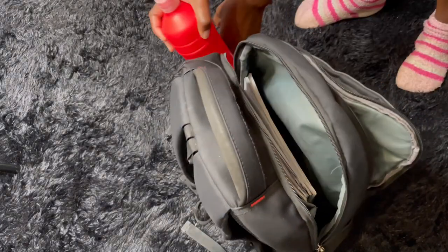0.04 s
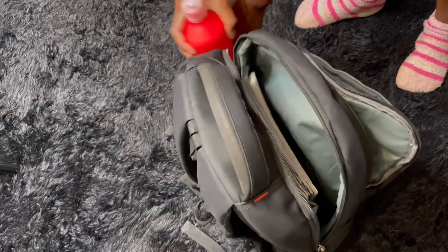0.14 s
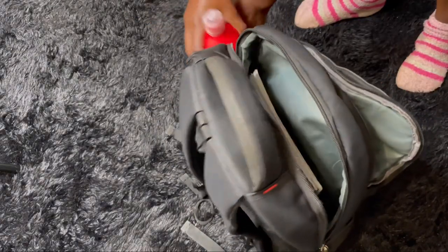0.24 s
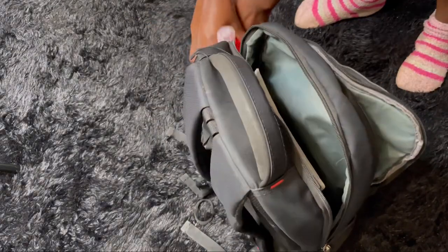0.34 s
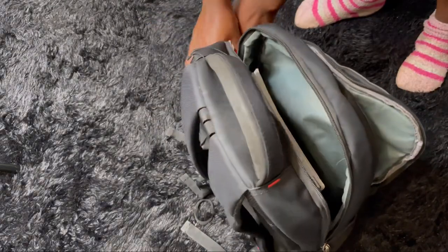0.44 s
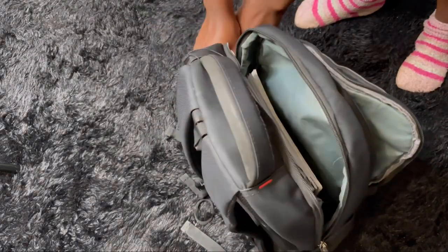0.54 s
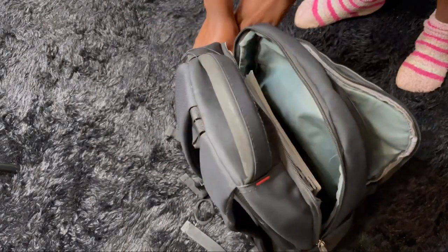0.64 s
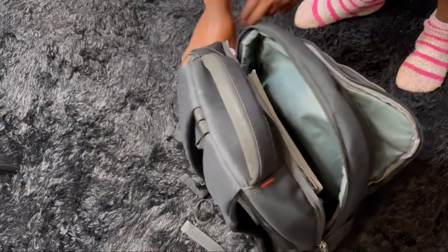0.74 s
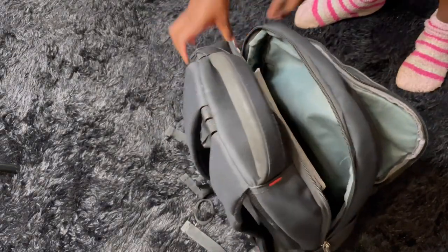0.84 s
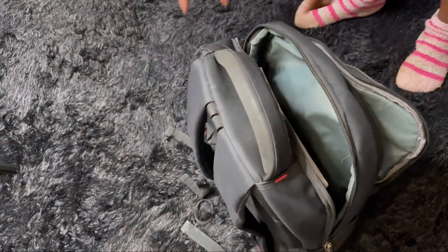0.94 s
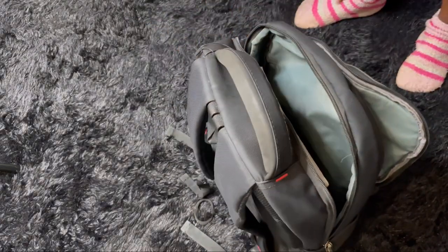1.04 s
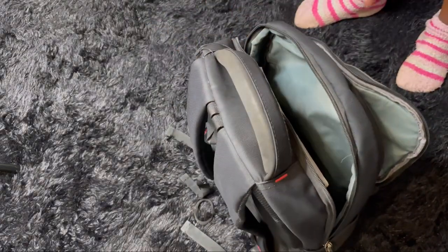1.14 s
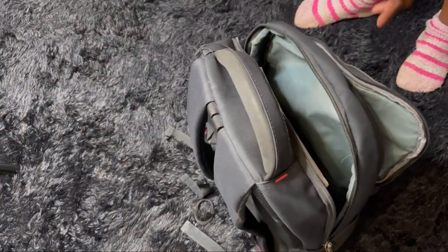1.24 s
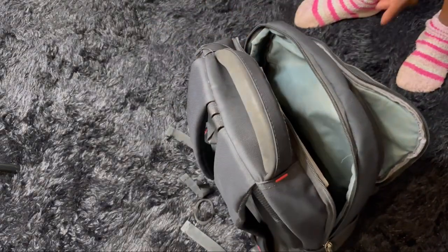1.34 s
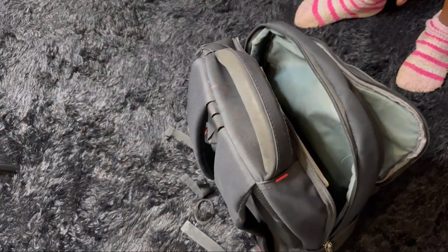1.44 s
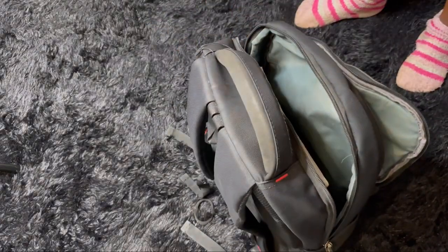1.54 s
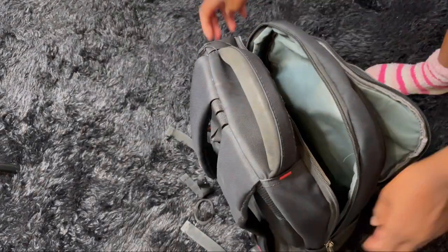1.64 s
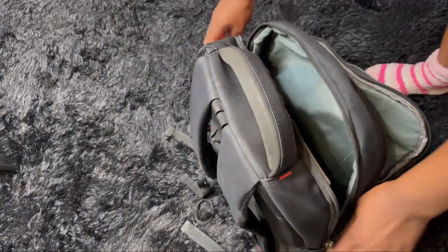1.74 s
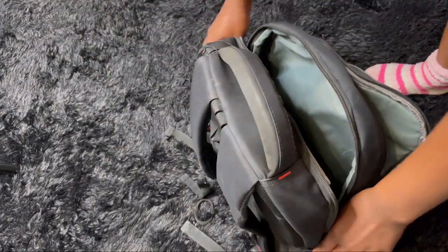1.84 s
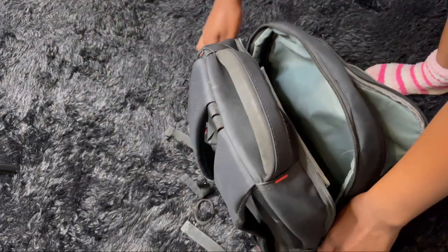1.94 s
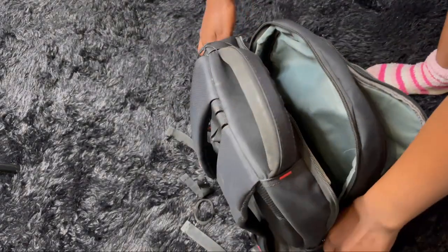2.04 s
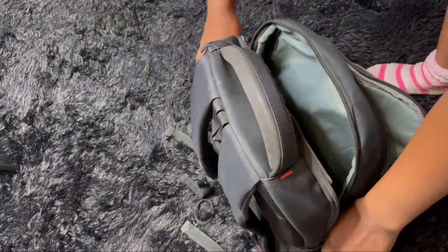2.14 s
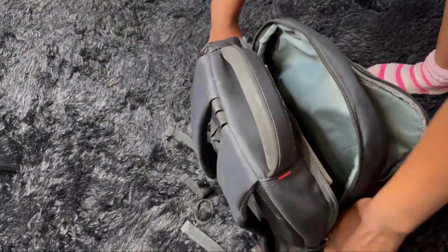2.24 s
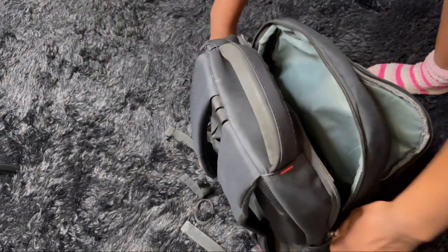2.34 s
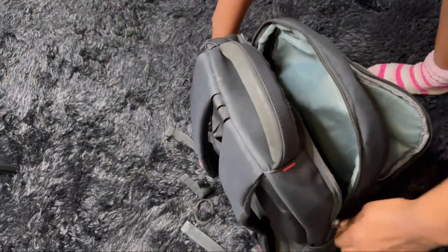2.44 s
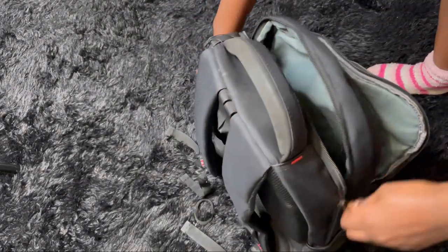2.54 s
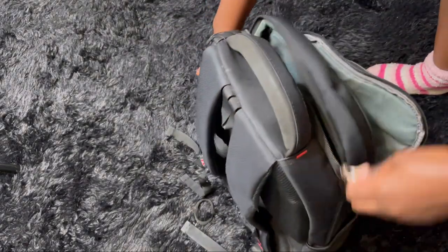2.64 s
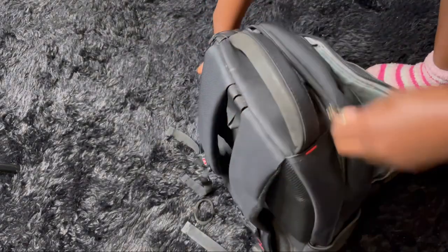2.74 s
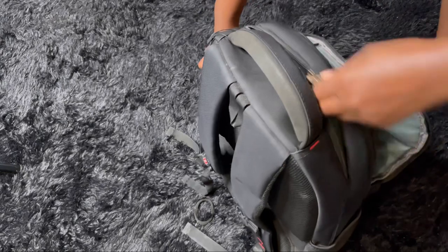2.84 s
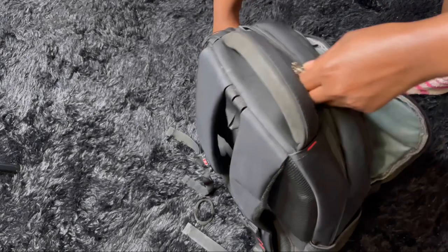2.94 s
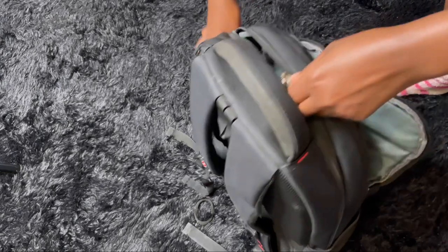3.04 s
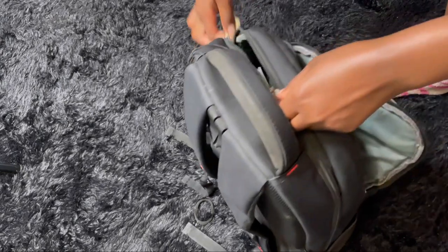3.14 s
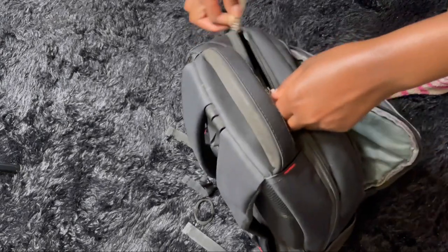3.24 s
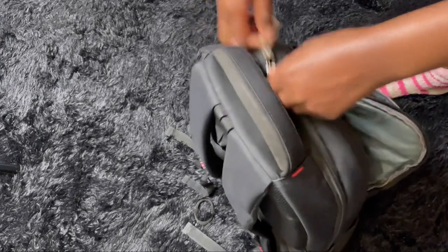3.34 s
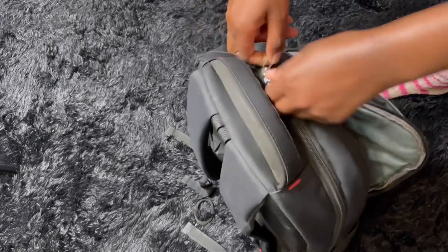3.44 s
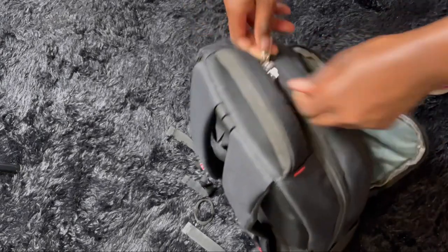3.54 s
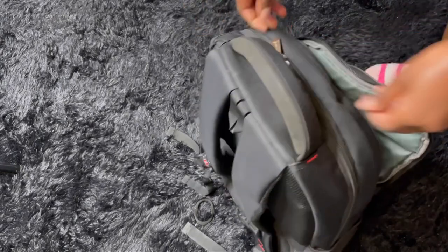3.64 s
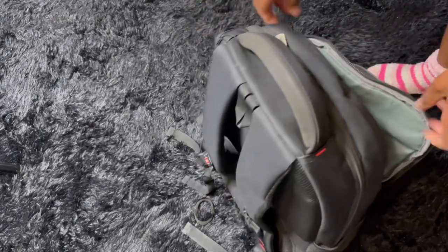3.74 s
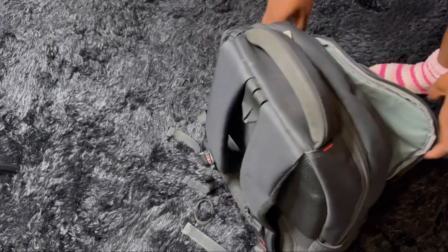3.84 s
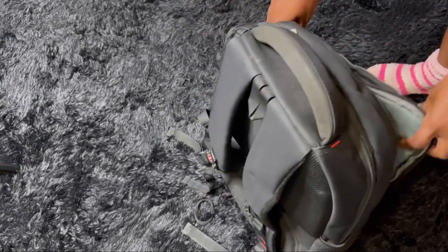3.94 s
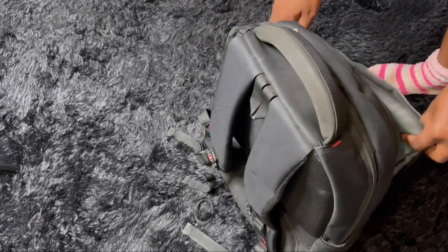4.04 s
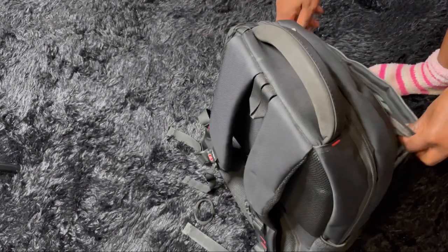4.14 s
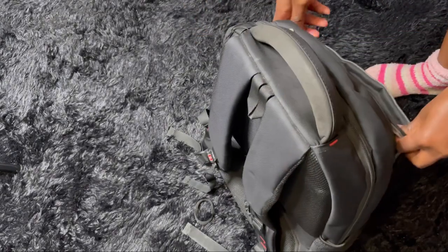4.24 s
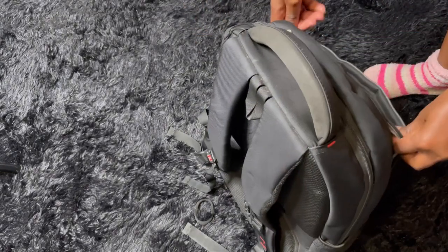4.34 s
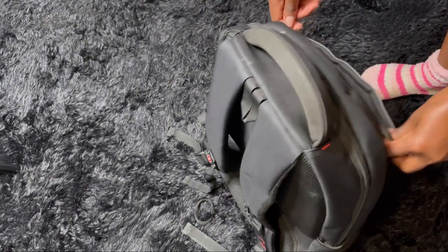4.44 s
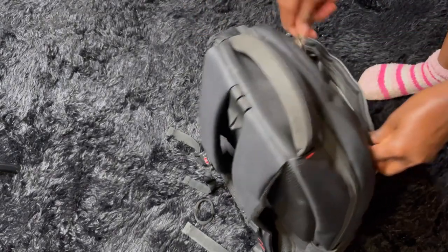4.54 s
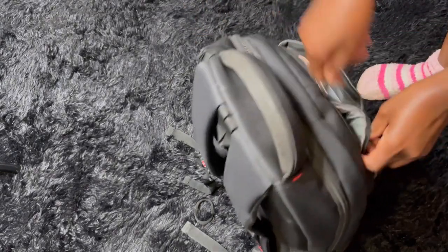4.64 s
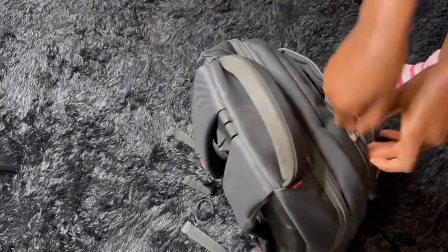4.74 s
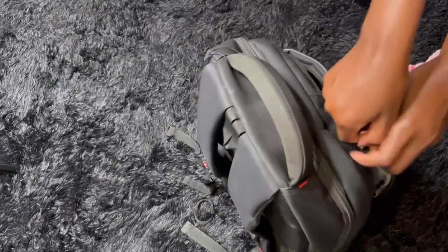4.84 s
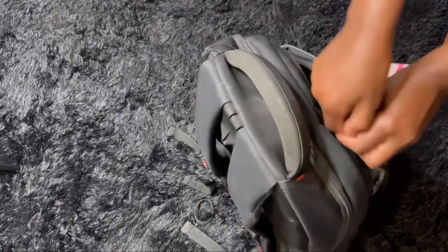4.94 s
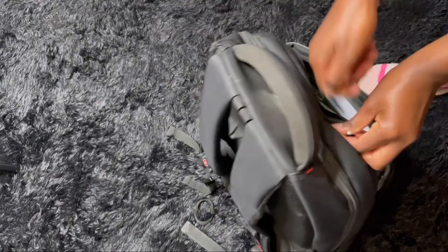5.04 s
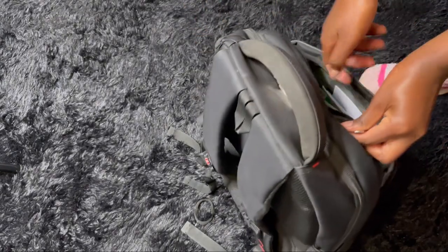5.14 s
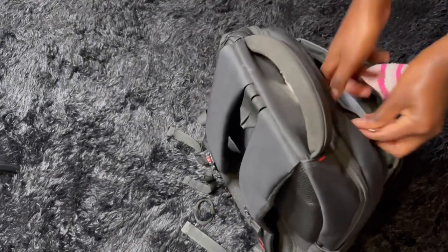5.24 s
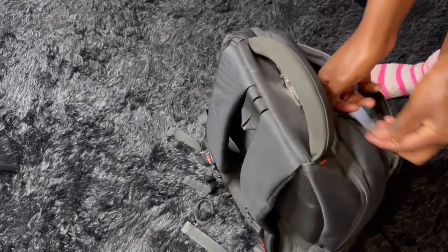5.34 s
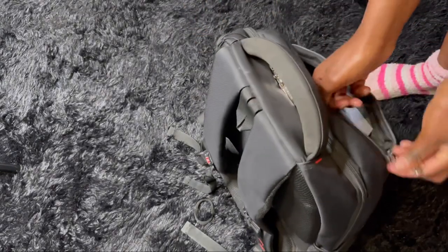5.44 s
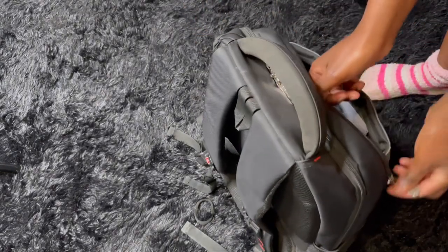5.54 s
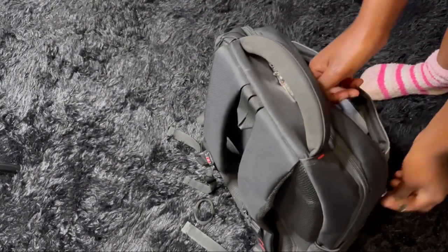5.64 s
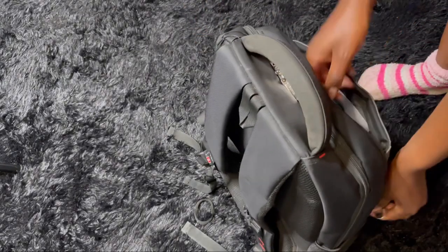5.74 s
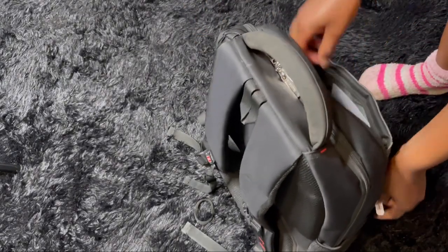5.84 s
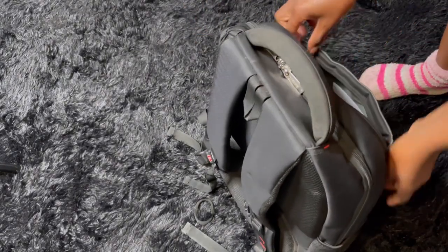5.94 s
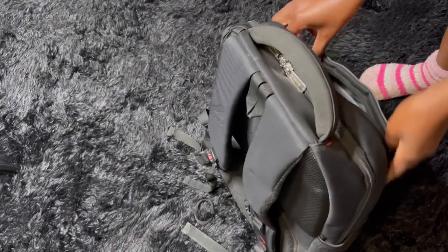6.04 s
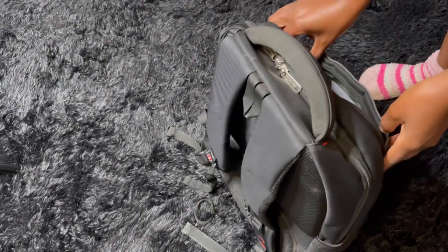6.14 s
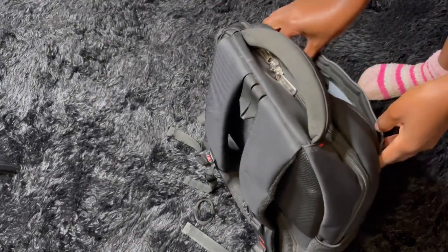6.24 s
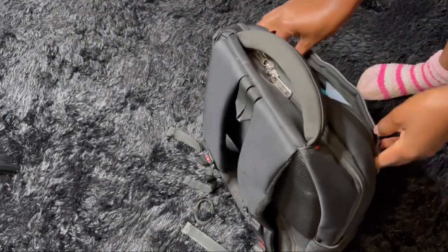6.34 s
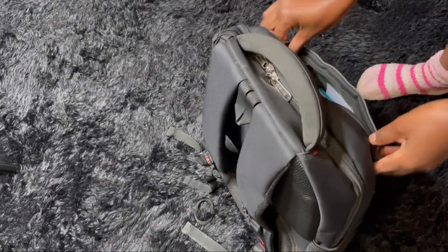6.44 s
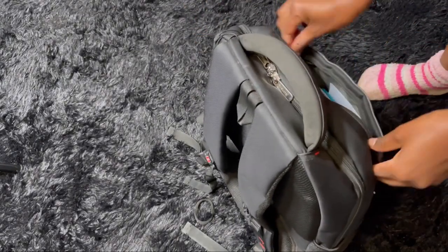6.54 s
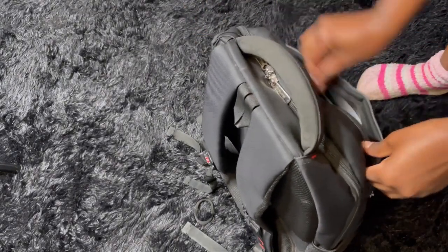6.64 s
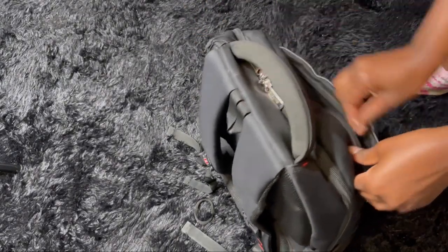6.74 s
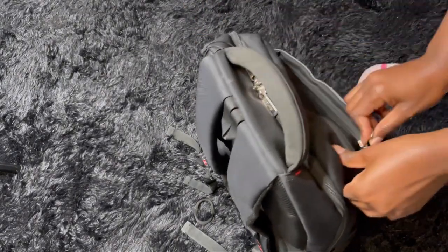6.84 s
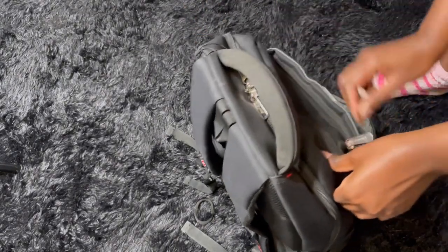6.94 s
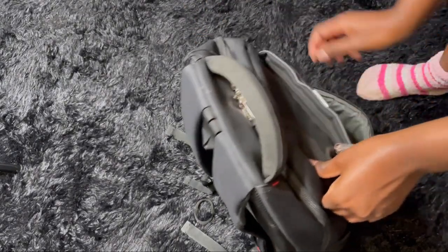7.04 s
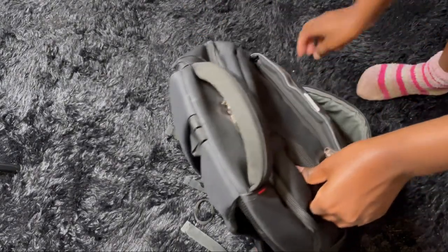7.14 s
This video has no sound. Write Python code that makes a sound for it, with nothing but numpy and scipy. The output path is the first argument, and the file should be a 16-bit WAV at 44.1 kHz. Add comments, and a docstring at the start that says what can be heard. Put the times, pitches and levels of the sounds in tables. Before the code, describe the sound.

Cloth rustles with a few dull knocks as a bottle is pushed into a fabric backpack. After a brief lull, the zipper buzzes shut in a string of short pulls, its pitch rising and falling with each one. Between pulls, metal tabs clink, hands rub and tap the cloth, and the bag bumps softly on carpet. It is all heard close up, in stereo, in a quiet room.

```python
"""Cloth rustles and knocks, then a coil zipper buzzes shut along a fabric backpack in short strokes.
Each tooth the slider joins drums the bag's panels and adds a burst of rasp, so the pitch follows the pull.
Metal pull tabs clink, hands tap and rub the cloth, and the bag bumps on the carpet.
A two-port microphone hears it all close up in a quiet room."""
import sys
import numpy as np
from scipy import signal
from scipy.fft import rfft, irfft, next_fast_len
from scipy.io import wavfile
from scipy.ndimage import uniform_filter1d, map_coordinates

SR = 44100
rng = np.random.default_rng(int(sys.argv[2]) if len(sys.argv) > 2 else 0)


def inscribe(sig):
    """Save sig as 16-bit PCM at rate SR to the path in sys.argv[1].

    A 1-D sig is mono; a 2-D sig holds one channel per row.
    Samples are clipped to [-1, 1] before scaling.
    """
    pcm = np.round(np.clip(np.atleast_2d(sig).T, -1, 1) * 32767)
    wavfile.write(sys.argv[1], SR, pcm.astype(np.int16))


N = 317079

# how alike left and right are for close sounds; the top treble is mono: f/Hz, correlation/0-1
CLOSE_LIKENESS = [(60, 0.94), (300, 0.87), (700, 0.23), (1500, 0.5), (4000, 0.41), (8000, 0.99), (11000, 1),
                  (13500, 1)]
# how alike left and right are for the room: f/Hz, correlation/0-1
ROOM_LIKENESS = [(60, 0.88), (300, 0.49), (700, 0.33), (3000, 0.18), (8000, 0.3), (11000, 0.61),
                 (13500, 0.62)]


def amp(db):
    """Decibels to gain."""
    return 10 ** (np.asarray(db) / 20)


def unit(x):
    """Scale to an rms of 1."""
    return x / np.sqrt(np.mean(x ** 2) + 1e-20)


def along(points, hz):
    """Read (f/Hz, value) points on a log frequency axis."""
    f, v = np.transpose(points)
    return np.interp(np.log(hz + 1), np.log(f + 1), v)


def curves(rows):
    """One automation curve for each column after the time."""
    times, *columns = np.transpose(rows)
    return [np.interp(np.arange(N) / SR, times, column) for column in columns]


def wobble(rate):
    """A smooth random curve, rate knots a second."""
    return map_coordinates(rng.standard_normal(int(N * rate / SR) + 4), [np.arange(N) * rate / SR])


def soft_noise(t, size):
    """Noise as long as t, averaged over size samples."""
    return uniform_filter1d(rng.standard_normal(len(t)), size=size)


def filtered(x, response):
    """Filter x by a complex response of frequency."""
    m = next_fast_len(N + SR // 2)
    return irfft(rfft(x, m) * response(np.fft.rfftfreq(m, 1 / SR)), m)[..., :N]


def stereo_noise(spectrum, likeness, grain=1):
    """Stereo noise of rms 1, chopped by a grain envelope before it is coloured."""
    spread = lambda hz: np.arccos(np.clip(along(likeness, hz), -1, 1)) / 2
    shape = lambda hz: amp(along(spectrum, hz)) * [np.cos(spread(hz)), np.sin(spread(hz))]
    mid, side = filtered(grain * rng.standard_normal((2, N)), shape)
    return unit(np.array([mid + side, mid - side]))


def resonate(x, modes):
    """Play x through (f/Hz, width/Hz, level/dB) resonances of alternating polarity."""
    return filtered(x, lambda f: sum((-1) ** k * amp(db) * 1j * f * width / (hz**2 - f**2 + 1j * f * width)
                                     for k, (hz, width, db) in enumerate(modes)))


def patchy(x, depth_db):
    """Shift the colour of the cloth in random patches of time and pitch."""
    bins = signal.stft(x, nperseg=1024, noverlap=768)[2]
    patches = uniform_filter1d(rng.standard_normal(bins.shape[-2:]), size=6, axis=0)
    patches = unit(uniform_filter1d(patches, size=6, axis=1))
    gain = amp(depth_db * patches - depth_db ** 2 * np.log(10) / 20)  # holds the mean power
    return signal.istft(bins * gain, nperseg=1024, noverlap=768)[1][..., :N]


def zipper():
    """Each tooth that the slider joins gives the bag panels one push and sheds one burst of rasp."""
    # slider moves, one list a stroke: t/s, rate/teeth per s, drumming level/dB
    strokes = [
        [(2.345, 151.3, -39), (2.387, 175.4, -36), (2.415, 213.9, -37.5), (2.445, 255.6, -40),
         (2.489, 283.2, -28), (2.519, 389.1, -27.5), (2.541, 394.6, -28), (2.569, 390.9, -27.5),
         (2.585, 370.4, -29.5), (2.611, 317.6, -28), (2.635, 363.6, -28.5), (2.657, 531.4, -28.5),
         (2.663, 539.7, -30.5), (2.691, 432.8, -34.5), (2.711, 440.7, -33), (2.733, 393.0, -38.5),
         (2.759, 322.3, -30.5), (2.781, 259.1, -36), (2.841, 228.3, -34), (2.867, 195.7, -34),
         (2.891, 157.8, -30), (2.925, 106.3, -38.5)],
        [(2.935, 105.4, -28.5), (2.953, 130.1, -33), (2.973, 158.5, -26), (2.999, 181.4, -24),
         (3.015, 248.0, -26.5), (3.021, 271.4, -24.5), (3.043, 289.2, -30.5), (3.059, 373.6, -26),
         (3.067, 391.7, -26), (3.101, 425.2, -19.5), (3.131, 445.9, -24.5), (3.163, 453.1, -22),
         (3.181, 509.6, -24), (3.197, 452.8, -49), (3.203, 417.8, -30.5), (3.213, 342.6, -25.5),
         (3.225, 259.8, -38), (3.28, 176.5, -33)],
        [(3.29, 183, -29), (3.315, 230, -29), (3.331, 290, -30), (3.35, 305, -24.5), (3.375, 336, -34.5)],
        [(4.39, 172.7, -57), (4.41, 219.6, -46), (4.434, 279.6, -42), (4.458, 266.8, -50.5),
         (4.5, 323.9, -41.5), (4.526, 300.6, -46), (4.566, 194.4, -39), (4.595, 232.0, -46)],
        [(4.6, 303.4, -38), (4.606, 337.1, -42.5), (4.62, 400.8, -35), (4.642, 440.3, -30.5),
         (4.66, 464.8, -42), (4.672, 572.9, -33.5), (4.69, 390.4, -32.5), (4.708, 432.1, -29.5),
         (4.72, 496.1, -38), (4.738, 427.0, -42), (4.76, 398.8, -48)],
        [(4.866, 400, -38), (4.875, 850, -36.5), (4.885, 900, -39.5), (4.893, 800, -61)],
        [(5.345, 157.6, -51), (5.369, 207.2, -44), (5.385, 286.1, -44), (5.391, 307.2, -37.5),
         (5.449, 257.8, -30), (5.475, 261.8, -32.5), (5.509, 269.3, -34), (5.529, 338.9, -44),
         (5.541, 373.0, -40), (5.57, 372.2, -35)],
        [(5.575, 347.9, -34), (5.593, 422.9, -25.5), (5.601, 447.4, -28), (5.609, 433.9, -36),
         (5.627, 394.8, -24.5), (5.655, 382.8, -24), (5.661, 370.4, -20), (5.669, 329.2, -21),
         (5.685, 246.0, -33), (5.717, 203.1, -34), (5.75, 145.4, -45)],
        [(6.54, 110.6, -58), (6.576, 166.1, -48), (6.59, 221.6, -36), (6.62, 396.8, -33.5), (6.64, 535.7, -57),
         (6.652, 608.6, -48), (6.7, 668.5, -34.5), (6.726, 638.6, -45), (6.77, 543.3, -34), (6.778, 470.1, -39),
         (6.792, 301.4, -33), (6.812, 197.5, -48.5), (6.83, 157.7, -51), (6.85, 115.6, -54)],
    ]
    # how each stroke drags: unevenness/0-1, small panels' level/dB
    drags = [(.22, 0.5), (.16, -1.5), (.6, -3), (.3, -1.5), (.15, -1.5), (.6, 9), (.09, 2.5), (.4, -5),
             (.3, -4)]
    # rasp along each run of strokes: t/s, level/dB
    rasp_runs = [
        [(2.345, -50), (2.431, -47), (2.453, -45.5), (2.487, -48), (2.505, -39), (2.635, -40), (2.647, -32),
         (2.699, -35.5), (2.737, -35), (2.755, -42), (2.893, -46.5), (2.93, -51)],
        [(2.935, -51), (2.979, -45), (3.085, -42), (3.093, -41), (3.103, -39.5), (3.135, -36), (3.147, -41),
         (3.171, -38), (3.227, -56.5), (3.375, -35.5)],
        [(4.39, -55), (4.398, -53.5), (4.5, -43.5), (4.538, -59), (4.658, -40), (4.668, -37.5), (4.734, -39),
         (4.76, -68)],
        [(5.255, -56.5), (5.279, -42.5), (5.297, -55.5), (5.423, -37), (5.501, -43.5), (5.517, -40.5),
         (5.535, -41.5), (5.571, -40.5), (5.585, -26.5), (5.659, -31), (5.695, -47), (5.75, -54)],
        [(6.548, -78), (6.598, -50), (6.618, -37.5), (6.654, -42), (6.704, -33.5), (6.714, -37), (6.736, -33.5),
         (6.792, -36.5), (6.808, -43.5), (6.85, -55)],
    ]
    # colour of the rasp: f/Hz, relative level/dB
    rasp_colour = [(200, -11), (600, 1), (1000, -3), (1400, 3), (1800, -2), (2300, -6.5), (2800, -7),
                   (3800, -9.5), (4800, -15.5), (6500, -16), (9000, -16), (13000, -17.5), (15500, -24),
                   (16200, -56.5)]
    # bag panel modes, the four of the large panels first: f/Hz, width/Hz, level/dB
    panels = [(154, 20, 1), (268.3, 44, -1.5), (435, 97, -2.5), (555, 117, -5), (910, 190, -2.5),
              (1013, 317, -7.5), (1247, 143, -6.5), (1270, 360, -14.5), (1960, 420, -18), (3160, 420, -33)]
    cruise_hz, catch_per_octave, snag = 300, .45, .6
    moves = [(*row, *drag) for stroke, drag in zip(strokes, drags) for row in stroke]
    rate, drum_db, uneven, small_db = curves(moves)
    rasp_db, = curves([row for run in rasp_runs for row in run])
    # snags come and go; below cruising speed the teeth catch more unevenly
    octaves_slow = np.maximum(-np.log2(rate / cruise_hz), 0)
    uneven = np.clip(uneven * np.exp(snag * wobble(25)) + catch_per_octave * octaves_slow, 0, 1)
    t = np.arange(N) / SR
    moving = sum((t > stroke[0][0] - .006) & (t < stroke[-1][0] + .006) for stroke in strokes) > 0
    moving = uniform_filter1d(1. * moving, size=300)
    jitter = .12 * (.12 + uneven) * wobble(300) + .07 * uneven * wobble(90) + .02 * wobble(40)
    teeth = np.cumsum(rate * (1 + jitter)) / SR
    strength = amp(3 * uneven * rng.standard_normal(N // 40)[teeth.astype(int)])
    tooth_age = teeth % 1 / rate
    snap = np.exp(-tooth_age / .00022) * amp(2.2 * wobble(45))
    grit = .3 * uneven * np.exp(-tooth_age / .002) * rng.standard_normal(N)
    pushes = moving * strength * (snap + grit)
    body = resonate(pushes, panels[:4]) + amp(small_db) * resonate(pushes, panels[4:])
    # level both layers so that the curves set their loudness at any tooth rate
    body_level = np.sqrt(np.abs(uniform_filter1d(body ** 2, size=2500))) + .0036
    drum = patchy(amp(drum_db) * moving * body / body_level, depth_db=1.5)
    bursts = np.sqrt(strength) * (.7 + np.exp(-tooth_age / .0006))
    bursts /= np.sqrt(np.abs(uniform_filter1d(bursts ** 2, size=1500)))
    rasp = patchy(stereo_noise(rasp_colour, CLOSE_LIKENESS, bursts), depth_db=2.5)
    return drum, amp(rasp_db) * moving * rasp


def taps():
    """A faint click, then 1.2 ms later a crack, a knock and a thump sinking as the panel wave spreads."""
    # dull taps on bottle, cloth and single teeth: t/s, level/dB, f/Hz, thump/dB re level, crack/dB
    hits = [(0.07, -23.5, 1440, -35, -29.5), (0.078, -35.5, 1500, 1, -22), (0.189, -27.5, 1510, -32, -22),
            (0.216, -23, 1500, -24, -34), (0.234, -27.5, 1680, -25, -29), (0.249, -22, 1370, -15, -24),
            (0.371, -23.5, 1970, -21, -36), (0.438, -23.5, 1510, -28, -18.5), (0.587, -38, 1180, -3, -34),
            (0.697, -44, 1740, -29, -39), (2.005, -46, 1200, -0.5, -45), (2.273, -30.5, 1020, -10, -21),
            (2.286, -31, 1040, -21, -31), (2.305, -29, 694, -8, -20), (2.318, -28, 750, -10, -26),
            (2.332, -17, 705, -20, -19), (2.341, -22, 1040, -21, -30.5), (2.361, -34, 1000, -19, -21),
            (3.456, -59, 1190, 14, -62), (3.579, -26.5, 1340, -5, -20.5), (3.65, -34.5, 1760, 8, -22),
            (3.722, -27, 820, -9, -35), (3.748, -27, 720, -12, -45), (3.855, -27, 890, -25, -48),
            (3.869, -35, 845, -29, -40), (3.96, -43.5, 816, 3, -51), (4.038, -44.5, 950, 2, -38),
            (4.839, -35, 1750, -20, -30.5), (4.85, -38, 1530, -22, -52), (4.8665, -36, 890, -15, -47),
            (5.278, -33, 1200, -5, -37), (5.261, -41.5, 1580, 4, -33), (5.755, -27.5, 880, -9, -29.5),
            (6.194, -59, 1600, -22, -36), (6.266, -39, 1820, -16, -31), (6.288, -53, 2500, -20, -30),
            (6.379, -43, 2140, -21, -34.5), (6.966, -40, 920, -11, -49), (7.072, -36, 870, -17, -49)]
    out, t = np.zeros(N + SR), np.arange(SR // 8) / SR
    for start, db, hz, thump_db, crack_db in hits:
        knock = amp(-60 * t / .012) * np.sin(2 * np.pi * hz * t) * (1 + 4 * soft_noise(t, 40))
        knock += amp(-17.5 - 60 * t / .019) * np.sin(2 * np.pi * 3 * hz * t)  # a higher shell mode
        rise_s = .0003 * amp(db - crack_db)  # the fainter the crack, the softer the attack
        knock *= 1 - np.exp(-t / rise_s)
        sinking_cycles = rng.uniform(120, 157) * t + 1.64 * (1 - np.exp(-t / .0034))
        thump = amp(thump_db - 60 * t / .05) * np.sin(2 * np.pi * sinking_cycles)
        edge = soft_noise(t, 2)
        edge /= np.abs(edge[:20]).max()
        crack = amp(crack_db) * (amp(-60 * t / .0012) + .17 * amp(-60 * t / .013)) * edge
        out[round(start * SR):][:len(t)] += amp(-28) * crack  # faint click
        out[round((start + .0012) * SR):][:len(t)] += amp(db) * (knock + thump) + crack
    return out[:N]


def tab_clinks():
    """The metal pull tabs touch: a dry tick, a short rattle and a thin ring."""
    # tab contacts: t/s, level/dB, ring/dB re level
    touches = [(2.134, -36, -8), (3.3713, -14.5, -28), (3.3752, -40, -30), (3.379, -36, -22),
               (3.5256, -26.5, -17), (3.541, -53, -12), (3.5747, -26, -23), (3.59, -23, -19),
               (3.601, -29.5, -16), (3.6496, -22, -19), (3.7285, -30.5, 3), (3.876, -32, -22),
               (3.886, -37, -24), (4.347, -33, -6.5), (4.7806, -24.5, -20), (5.7088, -32.5, -25),
               (5.947, -40, -30), (5.9603, -23.5, -30), (5.9769, -46, -25), (6.94, -46.5, 5),
               (6.947, -39, -2), (6.9805, -41.5, -10), (7.014, -55, -6), (7.084, -54, -10),
               (7.102, -55, -15)]
    # modes of a tab: f/Hz, level/dB, decay/share of t60_s
    tab_modes = [(3900, -8, 1.2), (7200, -7, 1), (7900, -14, .6), (9650, -2, 1.3), (11600, -12, .7),
                 (13200, -10, .8), (13800, -7, 1.1), (15100, -4, 1)]
    # resonances that colour the tick: f/Hz, width/Hz, level/dB
    tick_modes = [(3250, 960, -15.5), (7630, 1600, -4), (9400, 1430, 1.5), (13900, 1500, -9)]
    t60_s = .033
    rings, ticks, t = np.zeros(N + SR), np.zeros(N + SR), np.arange(SR // 5) / SR
    for start, db, ring_db in touches:
        ring = np.zeros(len(t))
        for hz, mode_db, share in tab_modes:
            decay = amp(mode_db + rng.normal(0, 3) - 60 * t / (t60_s * share))
            ring += decay * np.sin(2 * np.pi * hz * (1 + rng.normal(0, .008)) * t)
        shake = 1 + 3.3 * soft_noise(t, 40)  # loose tabs ring unsteadily
        contact = amp(3 - 60 * t / .0027) + amp(-60 * t / (.39 * t60_s))
        rattle = .21 * amp(-60 * t / (2.7 * t60_s) + 5.2 * unit(soft_noise(t, 50)))
        attack = amp(db) * (1 - np.exp(-t / .0002))
        rings[round(start * SR):][:len(t)] += amp(ring_db) * ring * shake * attack
        ticks[round(start * SR):][:len(t)] += (contact + rattle) * rng.standard_normal(len(t)) * attack
    return rings[:N] + amp(4) * resonate(ticks[:N], tick_modes)


def cloth_rustle():
    """Hands rub the cloth in lumps and make it hiss in fine grains; scuffs swell quickly and fade."""
    # hands on the cloth: t/s, rub level/dB, hiss level/dB
    handling = [(0.0, -52, -53), (0.136, -52, -71), (0.27, -55, -44.5), (0.4, -57, -50), (0.53, -50.5, -58),
                (0.632, -60.5, -63), (0.768, -57, -65.5), (0.86, -76.5, -79), (1.726, -79.5, -83.5),
                (1.83, -73, -53.5), (2.01, -64, -66.5), (2.176, -53, -52.5), (2.33, -55, -56.5),
                (3.4, -60, -59.5), (3.47, -60, -63.5), (3.614, -48, -79), (3.834, -55.5, -57),
                (4.142, -61.5, -90), (4.38, -60, -58), (4.77, -42.5, -50), (4.82, -46, -57),
                (5.0, -54, -58.5), (5.058, -63, -72.5), (5.24, -67, -69), (5.29, -46, -48), (5.4, -58, -76),
                (5.76, -50.5, -56), (6.066, -57.5, -55), (6.2, -66, -63), (6.318, -49, -61),
                (6.53, -76, -58.5), (6.86, -63.5, -60.5), (7.014, -66.5, -76.5), (7.19, -69, -82)]
    # short scuffs: t/s, drive/dB, hiss/dB re drive, length/s
    scuffs = [(0.076, -33, -7.5, 0.072), (0.13, -36.5, -20, 0.17), (0.232, -38, -12, 0.094),
              (0.352, -39.5, -2.5, 0.05), (0.43, -49.5, 6, 0.038), (0.58, -37.5, -4, 0.034),
              (0.704, -46.5, 1, 0.042), (1.733, -76.5, 20.5, 0.088), (1.824, -42.5, -28, 0.059),
              (1.917, -44.5, -7, 0.063), (3.519, -35.5, -5, 0.03), (3.679, -28.5, -24, 0.019),
              (3.743, -30.5, -41, 0.037), (3.87, -48, -13, 0.078), (3.955, -45.5, -5, 0.078),
              (4.022, -48, 2.5, 0.091), (4.138, -50, -11, 0.092), (4.862, -28.5, -15, 0.033),
              (5.875, -44, -4, 0.048), (5.947, -41, -28, 0.059), (6.01, -56.5, 7.5, 0.11),
              (6.258, -43, -2, 0.024), (6.458, -38.5, -17, 0.047), (6.929, -47, -13, 0.06)]
    # colours of rub, scuff and hiss: f/Hz, relative level/dB
    rub_colour = [(80, -22), (200, 2.5), (450, 3), (900, -3.5), (1500, -8), (2500, -18.5), (5000, -27)]
    scuff_colour = [(80, -28), (200, 1.5), (450, 5), (900, -1), (1500, -2), (2500, -12.5), (5000, -29)]
    hiss_colour = [(800, 4), (2000, 6.5), (4000, 3), (7000, 1), (9000, 2.5), (12600, 0), (15400, -5),
                   (16200, -47.5)]
    rub, hiss = amp(curves(handling))
    scuff, fizz, t = np.zeros(N + SR), np.zeros(N + SR), np.arange(SR // 2) / SR
    for start, db, hiss_db, length in scuffs:
        age = 3 * t / length
        swell = amp(db) * age * np.exp(-age)
        scuff[round(start * SR):][:len(t)] += swell
        fizz[round(start * SR):][:len(t)] += amp(hiss_db) * swell
    lumps = amp(2.84 * wobble(30) + 1.6 * wobble(150))
    grains = lumps ** .91 * amp(1.05 * wobble(900))
    return (rub * stereo_noise(rub_colour, CLOSE_LIKENESS, lumps)
            + scuff[:N] * stereo_noise(scuff_colour, CLOSE_LIKENESS, lumps)
            + (hiss + fizz[:N]) * stereo_noise(hiss_colour, CLOSE_LIKENESS, grains))


def bag_thuds():
    """The bag bumps softly on the carpet and rumbles as it shifts."""
    # bumps at their peaks: t/s, level/dB, f/Hz
    bumps = [(.114, -25, 124), (0.134, -37, 150), (.177, -30, 132), (0.257, -43, 140), (.292, -42, 130),
             (0.387, -40, 158), (.451, -34.5, 149), (.602, -41.5, 145), (.774, -53, 70), (1.843, -43, 161),
             (2.349, -29, 137), (2.721, -26.5, 126), (2.887, -28, 148), (2.988, -38, 149), (3.3, -34, 149),
             (3.4, -37, 102), (3.477, -51, 143), (3.6, -27, 99), (3.661, -34, 150), (3.775, -37, 86),
             (3.978, -38.5, 127), (4.054, -44.5, 148), (4.409, -38, 162), (4.786, -41, 75),
             (5.09, -45.5, 114), (5.278, -30.5, 151), (5.36, -30, 170), (5.767, -28.5, 160),
             (6.027, -42, 155), (6.304, -43, 90), (6.796, -30, 167), (6.979, -48, 137)]
    # rumble of the shifting bag: t/s, level/dB
    shifting = [(0.0, -55.5), (0.34, -51.5), (0.94, -71.5), (1.66, -75), (1.94, -64), (2.3, -72),
                (2.44, -54), (2.94, -48.5), (3.87, -55.5), (4.14, -62.5), (4.35, -61.5), (4.73, -51.5),
                (5.1, -65.5), (5.31, -55.5), (5.47, -58), (5.63, -57), (6.31, -61.5), (6.71, -44),
                (6.87, -65), (7.19, -69.5)]
    # colour of the rumble: f/Hz, relative level/dB
    rumble_colour = [(25, -44), (45, 1), (70, -1), (150, -2.5), (250, -17), (500, -48.5)]
    rise_s, fall_s, lead_s = .0035, .0079, .05
    rumble = amp(curves(shifting)[0] + 2.2 * wobble(9.2))
    thuds, t = np.zeros(N + SR), np.arange(SR // 2) / SR - lead_s
    swell = np.exp(np.minimum(t / rise_s, -t / fall_s))
    for peak, db, hz in bumps:
        tone = np.sin(2 * np.pi * (hz * t + rng.uniform()))
        thuds[round((peak - lead_s) * SR):][:len(t)] += amp(db) * swell * tone
    return thuds[:N] + rumble * stereo_noise(rumble_colour, CLOSE_LIKENESS, amp(2.2 * wobble(25)))


def room_reverb(send):
    """The carpeted room's short tail: each frequency dies at its own speed, the bass is near mono."""
    # decay of the room: f/Hz, t60/s
    decay_times = [(150, 0.067), (1000, 0.17), (5000, 0.15), (10000, 0.05), (14000, 0.091)]
    hz, t, noise = signal.stft(rng.standard_normal((2, SR // 3)), SR, nperseg=256)
    spread = np.arccos(np.clip(along(ROOM_LIKENESS, hz), -1, 1))[:, None] / 2
    stereo = np.cos(spread) * noise[0] + np.sin(spread) * noise[1] * [[[1]], [[-1]]]
    tail = signal.istft(stereo * amp(-60 * t / along(decay_times, hz)[:, None]), SR, nperseg=256)[1]
    predelayed = np.pad(send, (130, 0))[None]
    return signal.fftconvolve(predelayed, tail / np.linalg.norm(tail[0]), axes=1)[:, :N]


def room_tone():
    """A faint, steady low rumble with a trace of hiss."""
    # colour of the quiet room: f/Hz, relative level/dB
    colour = [(15, -29), (25, -11), (65, 6.5), (172, -25), (280, -12), (1150, -34), (7300, -38.5),
              (7920, -37), (8600, -48), (12600, -34.5), (16500, -45)]
    return amp(-69) * stereo_noise(colour, ROOM_LIKENESS)


def scene():
    """Mix the close sounds over the room tone; drumming, taps and clinks feed the reverb."""
    drum, rasp = zipper()
    knocks, metal = taps(), tab_clinks()
    reverb = room_reverb(amp(-5.5) * drum + amp(-4.5) * knocks + amp(-11.5) * metal)
    return drum + rasp + knocks + metal + bag_thuds() + cloth_rustle() + reverb + room_tone()


def record(dry):
    """The treble reaches the two ports out of step; the deepest bass and the very top roll off."""
    # phase lead of the left port: f/Hz, lead/rad
    left_lead = [(2000, 0), (4500, -.2), (6500, -1.5), (8500, -3.14), (10500, -4.5), (12500, -6.2),
                 (16500, -6.3)]
    # how much louder the left port is: f/Hz, level/dB
    left_lean = [(60, 0.5), (150, 2), (380, 1.5), (950, -0.5), (2380, 1.5), (5980, 1.5), (15000, -1)]
    low_cut_hz, top_hz = 34, 16700
    sides = np.array([[1], [-1]])

    def response(hz):
        ports = np.exp(.5j * along(left_lead, hz) * sides) * amp(along(left_lean, hz) / 2 * sides)
        low_cut = hz ** 3 / (hz ** 3 + low_cut_hz ** 3)
        high_cut = np.clip((top_hz - hz) / 1500, 0, 1) ** 2
        return ports * low_cut * high_cut
    return filtered(dry, response)


dry = scene()
out = record(dry)
inscribe(out)
```